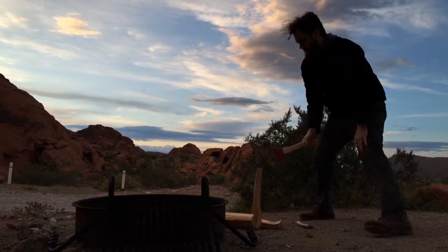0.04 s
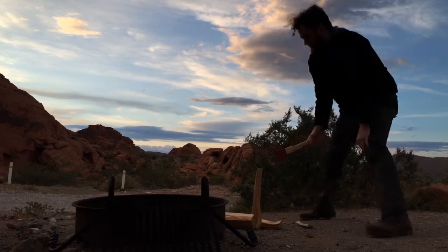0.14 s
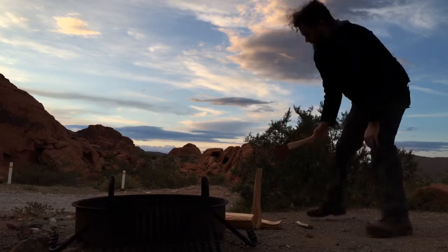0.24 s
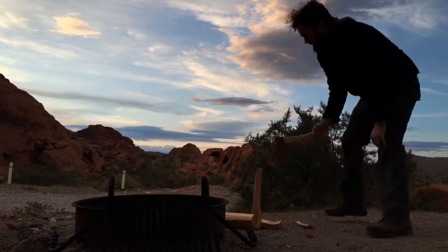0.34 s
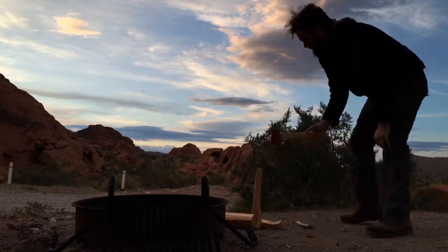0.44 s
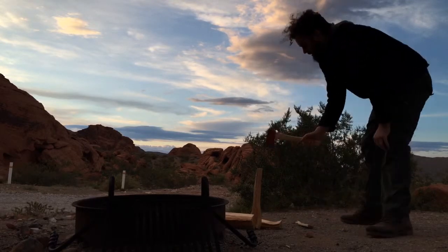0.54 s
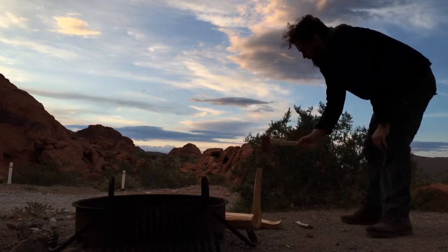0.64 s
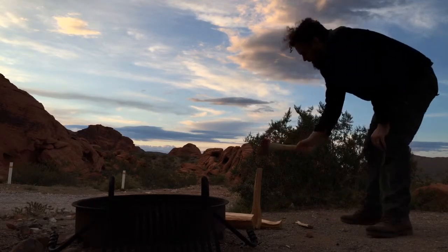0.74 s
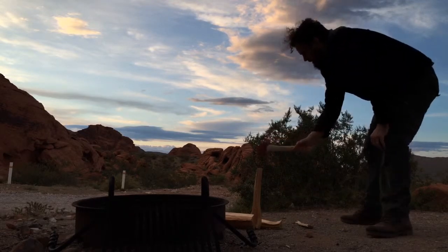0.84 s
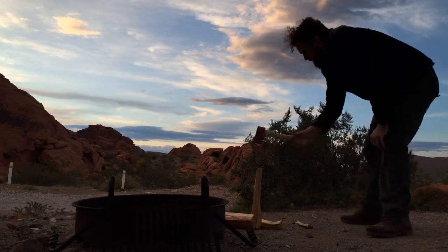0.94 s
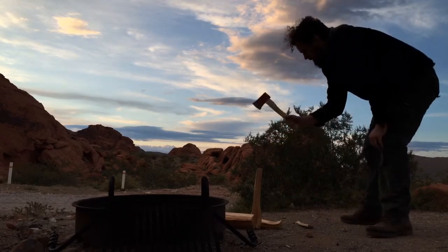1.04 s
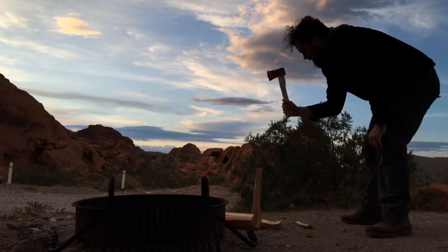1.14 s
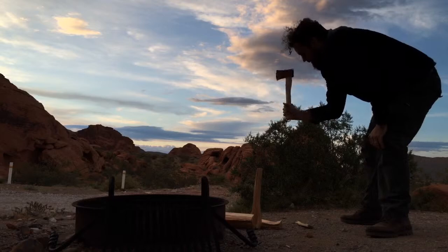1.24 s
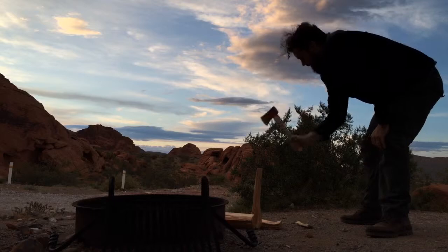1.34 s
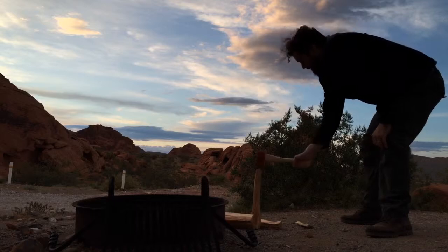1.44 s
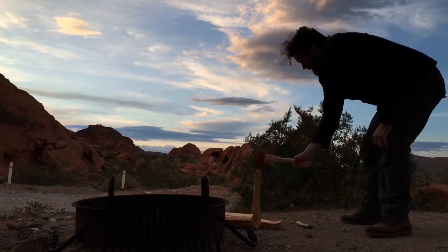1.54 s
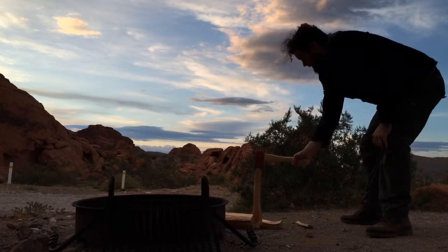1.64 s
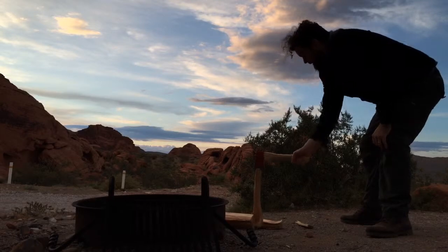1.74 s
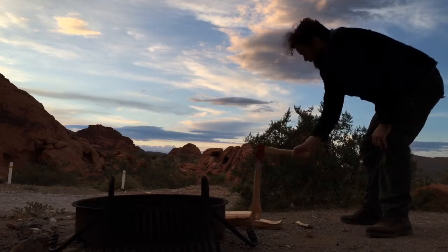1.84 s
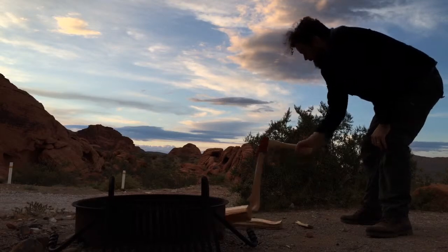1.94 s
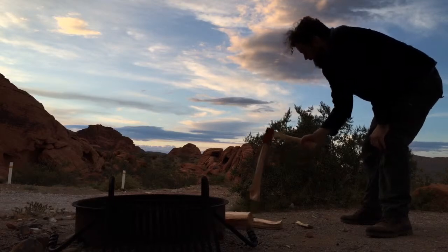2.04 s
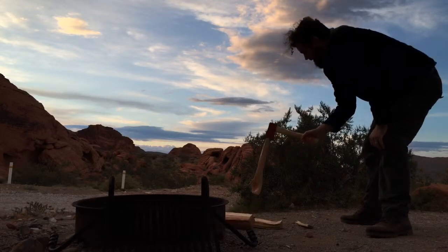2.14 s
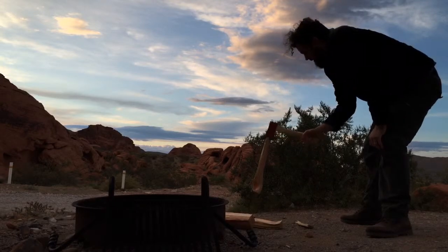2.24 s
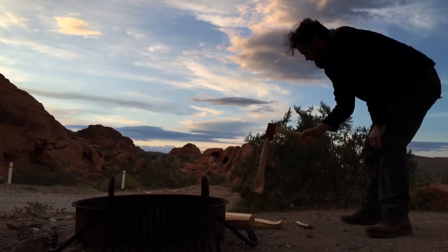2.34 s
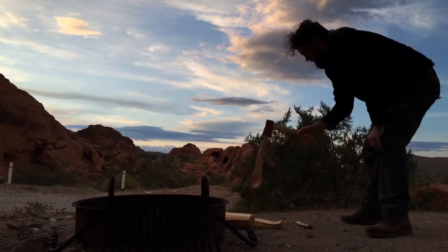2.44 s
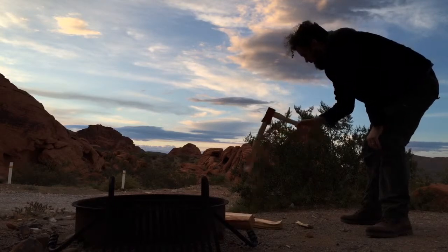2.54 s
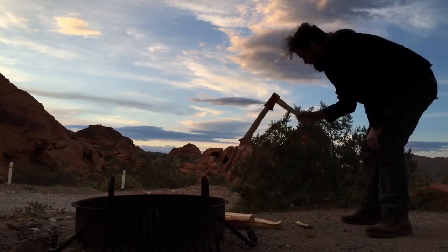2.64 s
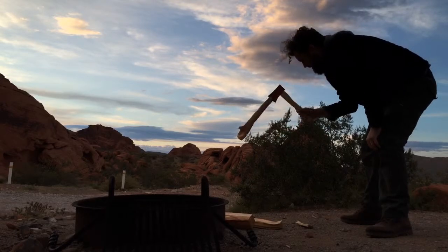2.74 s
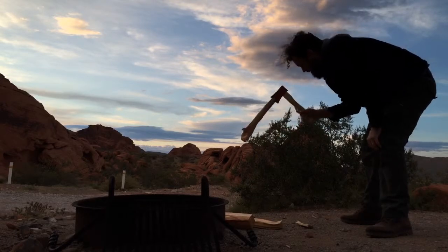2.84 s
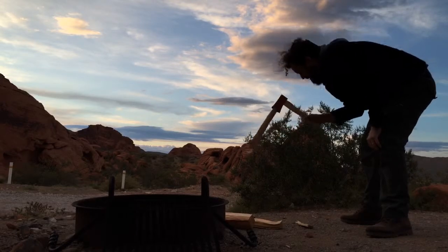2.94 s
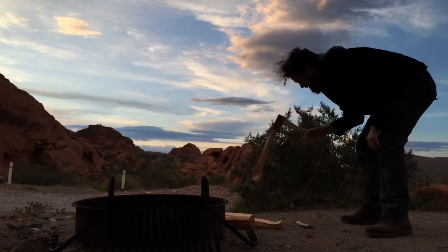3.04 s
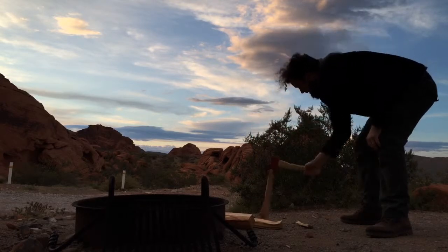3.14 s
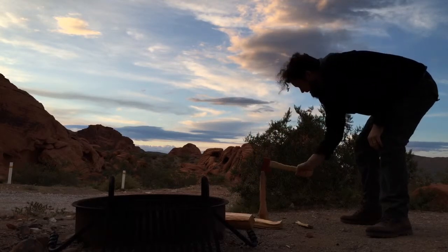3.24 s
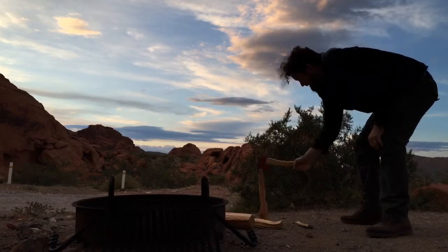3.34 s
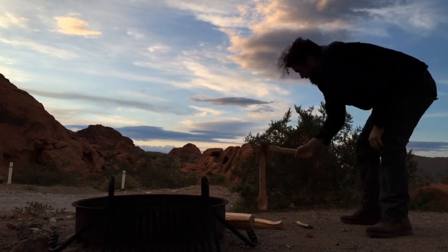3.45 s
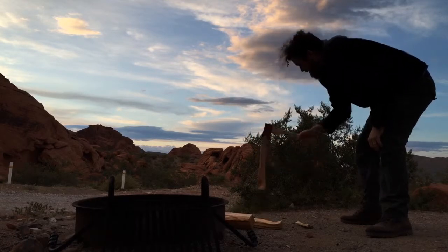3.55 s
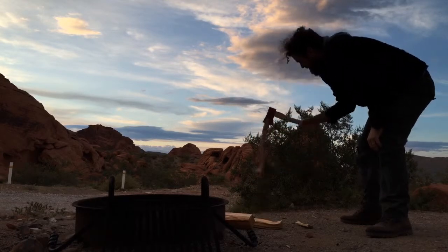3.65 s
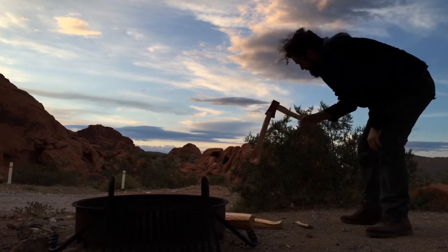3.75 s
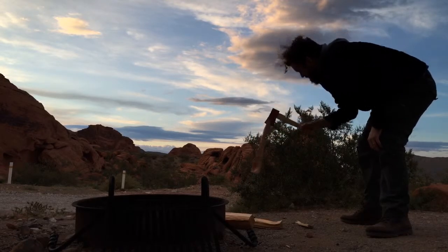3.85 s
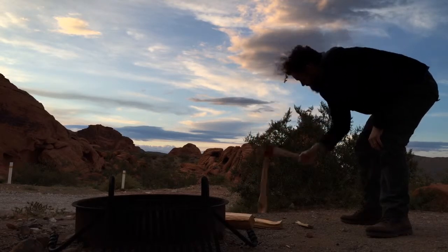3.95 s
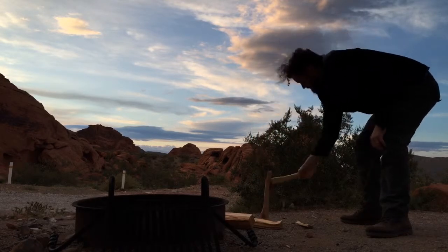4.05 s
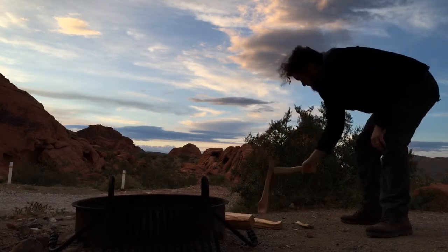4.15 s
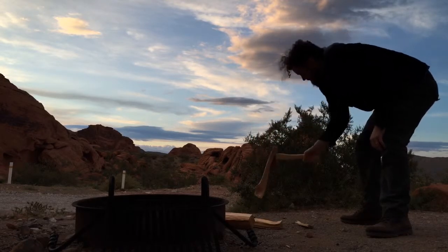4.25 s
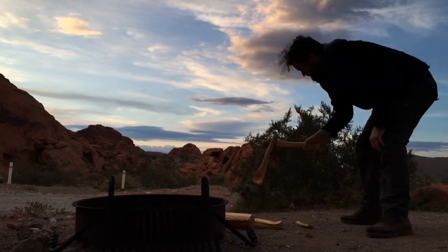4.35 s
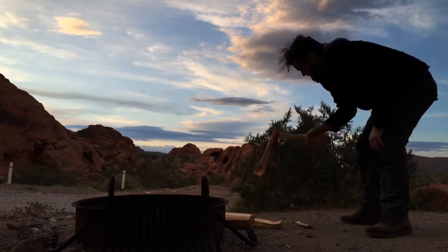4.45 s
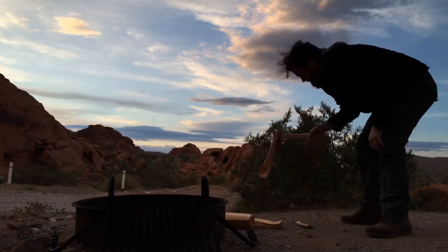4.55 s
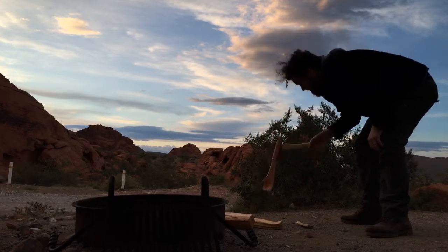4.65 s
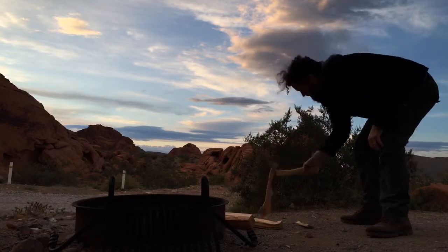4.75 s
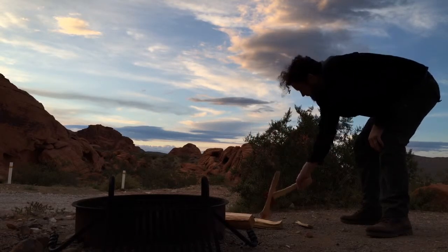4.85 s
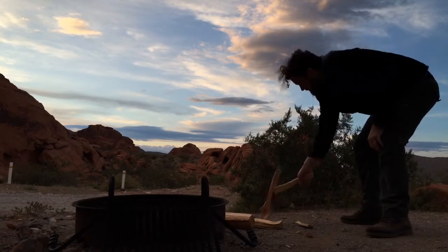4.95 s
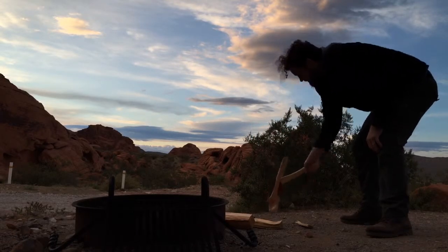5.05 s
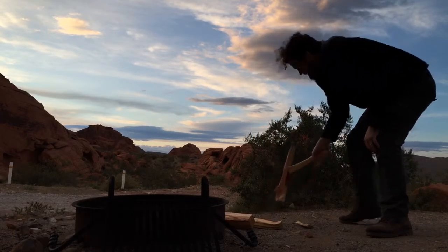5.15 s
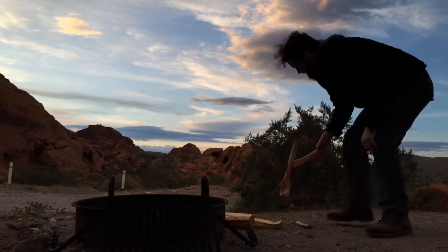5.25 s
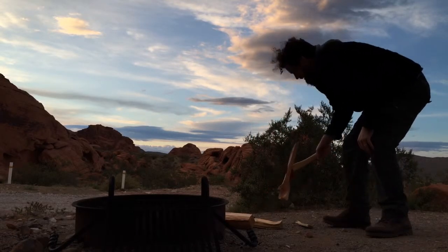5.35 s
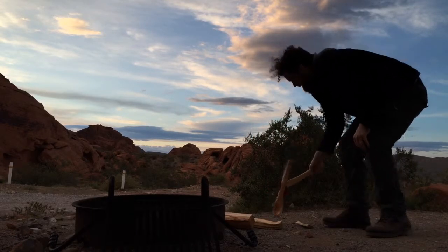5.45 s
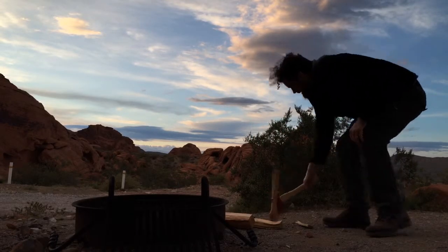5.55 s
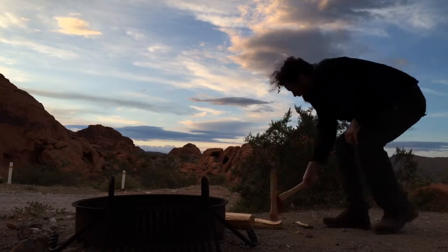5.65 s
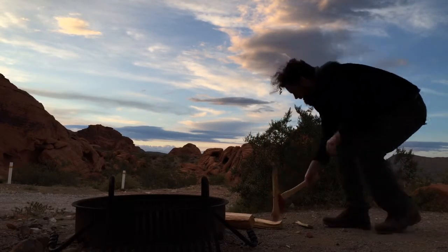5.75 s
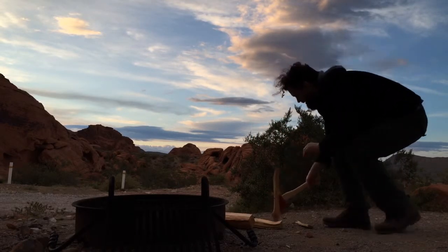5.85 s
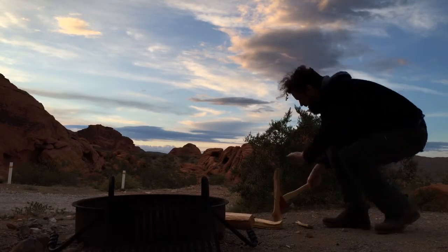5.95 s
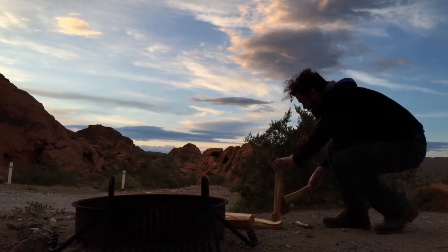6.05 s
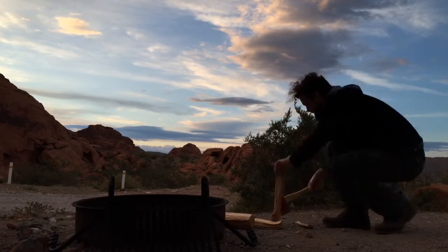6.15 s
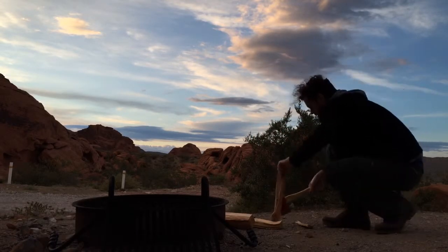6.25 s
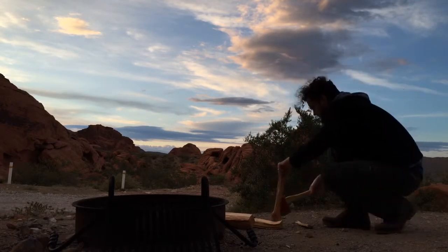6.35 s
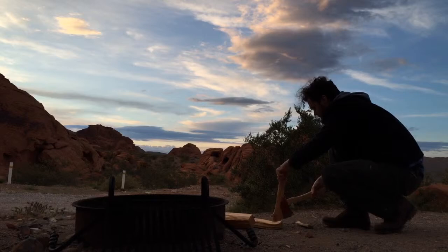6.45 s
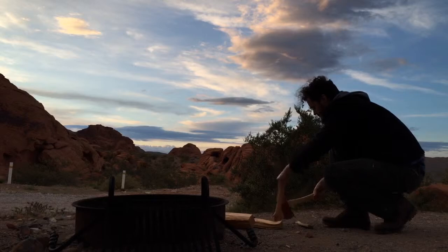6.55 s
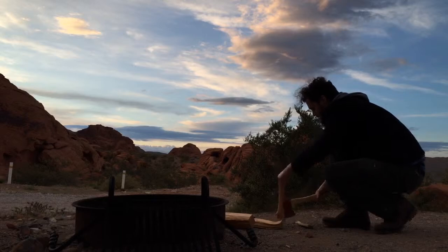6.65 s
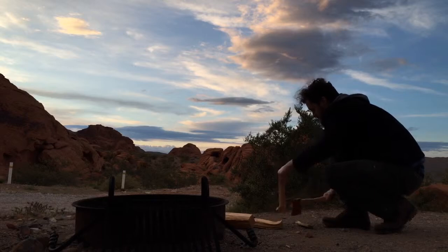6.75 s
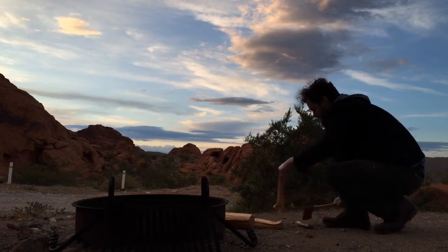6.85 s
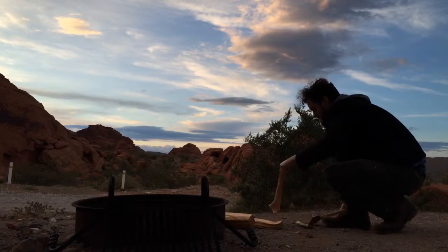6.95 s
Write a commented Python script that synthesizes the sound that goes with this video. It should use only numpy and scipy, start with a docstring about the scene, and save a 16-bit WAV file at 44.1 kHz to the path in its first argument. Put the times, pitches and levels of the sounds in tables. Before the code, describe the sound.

Spaced woody chops and a splintering crack at an open campsite, with boots scuffing gravel, soft thuds and low wind on the microphone.

```python
"""At a desert campsite with gravelly ground, kindling is split with a hatchet in an upright log.
Blows are coloured noise bursts with log and steel modes; the splinters' ticks are short bursts.
Boots scuff as modulated noise and thud as low swings; loose wood rings in pairs of modes.
The lifted wood squeaks on the blade as a gliding tone; ground, brush and rocks return noise tails.
Light wind on the microphone is lumpy low noise with a few low puffs, over a quiet steady hiss."""
import sys
import numpy as np
from scipy import signal
from scipy.fft import rfft, irfft, next_fast_len
from scipy.io import wavfile

SR = 44100
rng = np.random.default_rng(int(sys.argv[2]) if len(sys.argv) > 2 else 0)


def output_pcm(signal):
    """Save a mono or channel-first signal as 16-bit PCM at the path in sys.argv[1].

    Samples are clipped to [-1, 1] before scaling.
    """
    pcm = np.clip(np.atleast_2d(signal).T, -1, 1) * 32767
    wavfile.write(sys.argv[1], SR, np.round(pcm).astype(np.int16))


N = 308259
TIME = np.arange(N) / SR
SHORT = np.arange(8192) / SR   # time axis of a brief sound, s

# Wind rumble over time. Each row: time in seconds, mean level in dB.
WIND_LEVEL = [(0.0, -60), (0.28, -59.5), (0.42, -73), (1.03, -75), (1.2, -59), (1.49, -69), (1.79, -62),
              (1.98, -79), (2.23, -84), (2.38, -75.5), (3.2, -75), (3.43, -65), (3.93, -68.5), (4.2, -62.5),
              (4.5, -67), (5.34, -64.5), (6.45, -80.5), (6.85, -74)]
# Spectrum of the rumble. Each row: frequency in Hz, relative level per Hz in dB.
RUMBLE_SPECTRUM = [(15, -42), (25, -20), (45, -5), (70, 0.5), (100, -5), (140, -13), (200, -16.5),
                   (300, -31), (600, -69.5)]
# Puffs of wind on the microphone. Each row: start in seconds, peak level in dB, mean pitch in Hz.
PUFFS = [(0.059, -49, 93.4), (0.112, -38.5, 78), (0.172, -43, 68), (0.339, -32.5, 75), (0.794, -43, 77),
         (0.998, -44.5, 57), (1.073, -41.5, 61.5), (1.122, -40.5, 57.6), (1.382, -45.5, 60),
         (1.865, -43, 54.4)]
# Spectrum of the steady hiss. Each row: frequency in Hz, relative level per Hz in dB.
AIR_SPECTRUM = [(40, -11.5), (126, -11), (200, -13.5), (320, -22.5), (700, -27), (1300, -26), (2400, -26.5),
                (5000, -32), (15500, -38)]

# Strokes of boots, clothes and wood over the ground. Each row: start in seconds, attack in seconds,
# hold in seconds, release t60 in seconds, rubbing in dB, grit in dB (both before the layer's own gain).
SCUFFS = [(0.02, .035, .01, 0.44, -66.5, -74), (0.115, .025, 0.069, 0.44, -49.5, -56),
          (0.176, .005, 0.019, 0.11, -45.5, -73), (0.582, 0.0085, 0.0094, 0.11, -46.5, -56),
          (0.602, 0.0093, .13, 0.16, -52, -63), (1.266, 0.07, 0.058, 0.2, -66, -64),
          (2.061, 0.034, 0.017, 0.24, -63.5, -71), (2.196, 0.009, 0.01, 0.14, -61.5, -51),
          (2.245, 0.041, 0.013, 0.39, -58.5, -68.5), (3.18, 0.016, 0.025, 0.19, -53.5, -54),
          (3.376, 0.024, .005, .35, -58, -57), (3.557, .035, 0.037, 0.18, -62.5, -63.5),
          (3.943, 0.015, 0.017, .2, -51.5, -60.5), (3.983, 0.022, 0.018, 0.33, -51, -67),
          (4.02, 0.056, 0.061, 0.11, -50.5, -55.5), (4.644, 0.081, 0.019, 0.25, -64.5, -69),
          (5.009, 0.063, 0.033, 1, -55.5, -58.5), (5.439, 0.028, 0.011, 0.49, -54.5, -65),
          (5.657, .02, 0.043, 0.18, -56.5, -50), (5.751, .01, 0.055, .3, -61.5, -54.5),
          (5.792, 0.022, .015, 0.43, -51, -60), (5.901, 0.027, .006, 0.18, -59, -51),
          (5.938, 0.23, .03, .7, -64, -63), (6.185, 0.0094, 0.088, 0.47, -58.5, -70.5),
          (6.415, 0.13, .02, 0.12, -64, -58), (6.546, 0.064, .04, 0.16, -59, -50.5),
          (6.798, 0.013, 0.0057, .11, -50.5, -49), (6.835, .01, 0.1, .2, -63, -70),
          (6.921, 0.047, .02, .2, -45, -57)]
# Spectra of rubbing and of grit. Each row: frequency in Hz, relative level per Hz in dB.
RUB_SPECTRUM = [(100, -18), (200, -3), (350, -4), (480, -9), (700, -6.5), (1300, -6), (2000, -6.5),
                (2700, -11), (7000, -27.5), (12000, -50)]
GRIT_SPECTRUM = [(1500, -21), (3500, 0.5), (5500, 2), (8000, -3.5), (11000, -7.5), (15000, -8.5)]
# A sole grinding on loose gravel, one row: start in seconds, attack in seconds, hold in seconds,
# release t60 in seconds, level in dB.
GRIND = (0.626, .05, .075, .1, -47.5)

# Sharp ticks of splinters and pebbles. Each row: start in seconds, relative level in dB,
# bass in dB, treble in dB (both against the middle range).
TICKS = [(0.129, -41, 9, -14), (0.183, -36, -1, -24), (0.589, -36.5, 15, -16), (0.687, -33, -10, -34),
         (1.806, -43.5, -3, -15.5), (1.896, -32.5, 1, 5.5), (1.956, -35, 11, -7), (2.208, -41, -12, -7),
         (3.195, -37.5, -12.5, -25.5), (3.95, -34, -39, -44), (4.008, -35, -14, -37.5),
         (4.187, -26.5, -4, -9), (4.248, -29.5, -32, 5.5), (4.262, -38, -7, -8), (4.297, -34, -19, -39),
         (5.32, -43, -18, -25), (5.359, -44, -22.5, -37.5), (5.443, -32, -27.5, -35),
         (5.467, -35, 5.5, -34), (5.495, -37.5, 5, -15), (5.713, -34.5, 18, 8), (5.763, -37.5, 14, 10),
         (5.977, -43, -17, -25), (6.188, -37, -4, -41), (6.612, -40, -10.5, -16.5),
         (6.639, -32.5, -22, -15), (6.836, -25.5, 5, -28), (6.939, -32.5, 7.5, -28), (6.978, -31, -9, -34)]
# Dull thuds of boots and wood on the ground. Each row: start in seconds, relative level in dB,
# mean pitch in Hz, scrape of the landing in dB before the rubbing gain.
THUDS = [(0.516, -48.5, 213, -58.5), (1.024, -49.5, 177, -60), (1.288, -40.5, 163.7, -59),
         (1.965, -35.5, 182, -49), (2.283, -35, 168, -58), (2.314, -44, 196, -63),
         (2.361, -40.5, 188, -60.5), (2.792, -53.5, 197, -63.5), (3.202, -39, 197.8, -56),
         (3.906, -47, 182, -73.5), (4.811, -42.5, 175, -68), (5.465, -47, 157, -53.5),
         (5.64, -38.5, 213, -57), (5.66, -39, 175, -56), (5.816, -44, 227, -56), (6.191, -34.5, 183, -57),
         (6.872, -33.5, 190, -60), (6.981, -30, 183, -50)]

# Tone colours of the seven blows, in order. Each row: frequency in Hz, relative level per Hz in dB.
BITE = [(80, -21), (180, -7.5), (230, -12.5), (410, -0.2), (650, 1), (920, -8), (1160, -3), (1300, -0.5),
        (2070, -17.5), (2330, -8.5), (2940, -14.5), (3710, -8), (8380, -17), (15000, -20.5)]
SLAM = [(80, -12.5), (180, -2.5), (250, -6.5), (360, -0.5), (580, 0), (730, -10), (920, -4), (1300, -8.5),
        (1640, -2.5), (2070, -4.5), (2620, -10), (5910, -10), (11880, -13.5), (15000, -15.5)]
SPLIT = [(80, -18), (140, -11.5), (200, -7.5), (290, -17), (460, -1), (1160, -2.5), (1640, -11.5),
         (1840, -15.5), (2940, -10), (4170, -5.5), (5260, -11), (6640, -8.5), (8380, -14.5), (15000, -19)]
TEAR = [(88, -43), (150, -7.5), (332, -13), (618, -2), (1240, -13), (1540, -16.5), (4140, -10), (5990, -17),
        (7130, -11), (10500, -23), (11800, -13), (15500, -17)]
RIP = [(88, -22), (150, -9), (352, -8), (583, -8.5), (1540, -16), (2600, -4.5), (3830, -14), (4650, -7.5),
       (10500, -16.5), (14300, -19), (15500, -21)]
PRISE = [(180, -34), (300, 3), (571, -6), (1620, -6.5), (1810, -12.5), (3750, -6), (6680, -9), (7250, -5),
         (15500, -13)]
SNAP = [(120, -67), (200, -34), (974, -13.5), (1150, -24.5), (1910, -7), (2130, -9), (2800, -8.5),
        (3480, -3), (4180, -11.5), (6020, -8), (7900, -16.5), (9480, -13), (11400, -19), (13400, -9.5),
        (15500, -36)]
# Blows on the log. Each row: start in seconds, rms level over 20 ms in dB (steel apart),
# crack rise in seconds, start of the second crack in seconds, second crack in dB against the first,
# splintering in dB against the first before its random spread, tone colour.
BLOWS = [(1.5462, -20, 0.0032, 1.5541, -1.5, -16.5, BITE), (3.2899, -20.5, 0.0025, 3.2956, -2, -19, SLAM),
         (4.1232, -17.5, 0.0025, 4.1303, 0, -10, SPLIT), (4.9198, -29, 0.0017, 4.9341, -1, -8, TEAR),
         (4.9501, -29.5, 0.00176, 4.9579, -4, -8.5, RIP), (5.6379, -36, 0.0023, 5.6465, -21, -3, PRISE),
         (6.5285, -26, 0.0013, 6.5345, 8, -14, SNAP)]
# Modes of the log. Each row: frequency in Hz, mean relative level in dB before colouring, t60 in seconds.
LOG_MODES = [(198, -12, 0.06), (443, -1.5, 0.013), (598, 2, .024), (691, -6.5, 0.0071), (935, -10.5, 0.01),
             (1230, 0, 0.013), (1590, -4, 0.012), (1930, -5, 0.015), (2480, -11, 0.017), (2820, -12, 0.024),
             (3940, -15.5, 0.046), (4000, -6, 0.012), (5790, -6, 0.032)]
# Faint after-ring of the steel. Each row: frequency in Hz, mean relative level in dB, t60 in seconds.
STEEL_MODES = [(657, -51.5, 1), (920, -55, .4), (1570, -51, .5), (3460, -59.5, .45), (6000, -52, .4)]

# Chips and loose sticks, landing or jostled. Each row: start in seconds, relative level in dB,
# mean pitch in Hz, upper mean pitch in Hz, upper mode in dB against the lower, t60 in seconds.
CLINKS = [(1.586, -54.5, 1370, 1720, 13, 0.11), (1.803, -53, 643, 1173, -5.5, .15),
          (1.897, -52, 1150, 2590, -8, 0.12), (1.962, -41.5, 638, 1594, -6.5, .13),
          (2.204, -55.5, 920, 1444, 0, 0.38), (2.275, -48.5, 1160, 1775, -2.5, 0.088),
          (2.288, -44, 340, 550, -12.5, 0.18), (2.313, -50, 870, 1270, -1.5, 0.064),
          (3.454, -52.5, 608, 3464, -4, .21), (3.586, -49, 1400, 2564, -5, 0.087),
          (4.248, -52, 2940, 5970, 4, 0.14), (4.326, -55, 2990, 6020, -0.5, 0.14),
          (5.149, -47, 1890, 2460, 6, 0.047), (5.443, -44.5, 1670, 2360, 9, 0.027),
          (5.492, -53, 576, 1234, 12.5, 0.1), (5.544, -48.5, 905, 1206, 4, 0.12),
          (6.611, -48.5, 2030, 2984, 4.5, 0.22), (6.64, -49, 900, 1510, -13, 0.14),
          (6.837, -42, 466, 810, -3, 0.093)]
# Squeak of wood on the wedged blade as it is lifted, one row: start in seconds, attack in seconds,
# hold in seconds, release t60 in seconds, mean level in dB, first mean pitch in Hz, last mean pitch in Hz.
SQUEAK = (3.369, .02, .02, .09, -52, 820, 1190)

# Decay of sound scattered by ground and brush. Each row: frequency in Hz, t60 in seconds.
SCATTER_T60 = [(150, 0.45), (500, 0.083), (1400, 0.17), (4000, 0.14), (12000, 0.07)]
# Echoes from rocks. Each row: delay of the onset in seconds, energy in dB before the far low-pass.
ROCKS = [(.108, -47.5), (.132, -48.5), (.178, -46.5)]


def from_db(db):
    """Logarithmic level: twenty decibels are a factor of ten in amplitude."""
    return 10 ** (np.asarray(db) / 20)


def unit_energy(x):
    """Energy normalisation: the sum of squares becomes 1."""
    return x / np.sqrt(np.sum(x ** 2) + 1e-20)


def at_hz(points, hz):
    """Logarithmic frequency scale: a table is interpolated along it."""
    f, value = np.transpose(points)
    return np.interp(np.log(np.maximum(hz, 1)), np.log(f), value)


def add(out, s, sound):
    """Superposition: a sound is summed into the output from time s."""
    i = max(round(s * SR), 0)
    out[i:i + len(sound)] += sound[:max(len(out) - i, 0)]


def flutter(per_s):
    """Random modulation: straight lines join Gaussian values drawn per_s times a second."""
    return np.interp(TIME * per_s, np.arange(4096), rng.standard_normal(4096))


def noise(spectrum, grain_db=0):
    """Spectral shaping of noise to rms 1; uneven grain sizes make it crunch."""
    grain_sizes = from_db(grain_db * np.minimum(rng.exponential(1, N), 6))
    grains = rng.standard_normal(N) * grain_sizes
    size = next_fast_len(N)
    gains = from_db(at_hz(spectrum, np.fft.rfftfreq(size, 1 / SR)))
    shaped = irfft(rfft(grains, size) * gains, size)
    return unit_energy(shaped[:N]) * np.sqrt(N)


def coloured(x, spectrum):
    """Minimum-phase filtering: a short sound takes the broad outline of a spectrum, with energy 1."""
    bins = rfft(x)
    k = np.arange(len(bins))
    # outline: rms over half an octave around each bin
    low = (k / 2 ** .25).astype(int)
    high = np.minimum((k * 2 ** .25).astype(int) + 2, k[-1])
    running = np.cumsum(abs(bins) ** 2)
    outline = np.sqrt((running[high] - running[low]) / (high - low) + 1e-12)
    wanted = from_db(at_hz(spectrum, k * SR / len(x)))
    # keeping only the causal half of the cepstrum makes the filter causal
    cepstrum = irfft(np.log(wanted / outline))
    causal_filter = np.exp(rfft(2 * cepstrum[:len(x) // 2], len(x)))
    return unit_energy(irfft(bins * causal_filter))


def swell(t, rise):
    """Impulsive envelope: it peaks at 1 after the rise time, then dies."""
    age = np.maximum(t, 0) / rise
    return age * np.exp(1 - age)


def stroke(s, attack, hold, t60):
    """Envelope of one movement: linear growth, a hold at 1 and exponential decay."""
    age = TIME - s
    decay = from_db(-60 * np.clip((age - attack - hold) / t60, 0, 2))
    return np.clip(age / attack, 0, 1) * decay


def ringing(modes, t, spread_db):
    """Modal superposition: decaying sines start together, with new strengths at each blow."""
    out = np.zeros(len(t))
    for hz, db, t60 in modes:
        strength_db = db + spread_db * rng.normal()
        out += from_db(strength_db - 60 * t / t60) * np.sin(2 * np.pi * hz * t)
    return out


def thumps(rows, rise, uneven):
    """Damped low oscillation: each soft push gives a few cycles of unsteady pitch."""
    out = np.zeros(N)
    for s, db, hz in rows:
        unsteady_hz = hz * (1 + uneven * flutter(hz)[:len(SHORT)])
        turns = np.cumsum(unsteady_hz) / SR
        add(out, s, from_db(db) * swell(SHORT, rise) * np.sin(2 * np.pi * turns))
    return out


def wind(gust_db=7.0, gusts_per_s=8.1):
    """Pressure fluctuation at the microphone: low noise of lumpy level, with a few damped puffs."""
    level_db = np.interp(TIME, *np.transpose(WIND_LEVEL)) + gust_db * np.tanh(flutter(gusts_per_s))
    rumble = from_db(level_db) * noise(RUMBLE_SPECTRUM)
    return rumble + thumps(PUFFS, rise=0.011, uneven=0.43)


def hiss(level_db=-68.3):
    """Stationary noise: a fixed spectrum at a constant mean level."""
    return from_db(level_db) * noise(AIR_SPECTRUM)


def patchy(x, patch_db=2.7, per_s=45):
    """Shifting contacts: overlapping bands a third of an octave apart swell separately; rms 1."""
    size = next_fast_len(N)
    bins, out = rfft(x, size), np.zeros(N)
    hz = np.fft.rfftfreq(size, 1 / SR)
    place = np.clip(3 * np.log2(hz / 250 + 1e-9), 0, 13)
    for band in range(14):
        share = np.maximum(1 - abs(place - band), 0)
        out += irfft(bins * share, size)[:N] * from_db(patch_db * flutter(per_s))
    return unit_energy(out) * np.sqrt(N)


def strays(per_s=26, centre_hz=2000, octaves=.7, t60=.012, spread_db=1.5):
    """Resonant filtering of impacts: single flicked stones click at pitches of their own, peaks near 1."""
    out, t = np.zeros(N), TIME[:1024]
    starts = np.cumsum(rng.exponential(size=400)) / per_s
    draws = np.clip(rng.standard_normal(size=(400, 2)), -2, 2)
    for s, (pitch, size) in zip(starts, draws):
        hz = centre_hz * 2 ** (octaves * pitch)
        crack = rng.standard_normal(len(t)) * from_db(-60 * t / t60)
        click = signal.lfilter(*signal.iirpeak(hz, 2, fs=SR), crack)
        add(out, s, from_db(spread_db * size) * click / abs(click).max())
    return out


def pebbles(count=6500, centre_hz=1850, octaves=.38, t60=.016, spread_db=4):
    """Dense superposition of impacts: small stones ring briefly at random pitches; rms 1."""
    out, t = np.zeros(N), TIME[:1024]
    draws = np.clip(rng.standard_normal(size=(count, 2)), -2, 2)
    for when, (pitch, size) in zip(rng.random(size=count), draws):
        hz = centre_hz * 2 ** (octaves * pitch)
        envelope = from_db(spread_db * size - 60 * t / t60)
        add(out, when * N / SR, envelope * np.sin(2 * np.pi * hz * t))
    return unit_energy(out) * np.sqrt(N)


def scuffs(rub_db=-1.0, grit_db=-2, stick_db=1.46, crunch_db=2.0, pebble_db=-4, stray_db=11):
    """Stick-slip friction: soles and cloth rub in uneven slips, while pebbles roll and grit crunches."""
    # the scrape of a landing dies quickly and stirs little grit
    landing_rise, landing_t60, landing_grit_db = 0.0023, .11, -15.5
    landings = [(s, landing_rise, landing_rise, landing_t60, db, db + landing_grit_db)
                for s, _, _, db in THUDS]
    rub_power, grit_power = np.zeros(N), np.zeros(N)
    # overlapping strokes add as powers
    for s, attack, hold, t60, rubbing_db, gritty_db in SCUFFS + landings:
        power = stroke(s, attack, hold, t60) ** 2
        rub_power += power * from_db(rubbing_db) ** 2
        grit_power += power * from_db(gritty_db) ** 2
    # quick slips, plus slower changes of pressure
    slips = flutter(170) + 0.53 * flutter(45)
    rub = np.sqrt(rub_power) * from_db(rub_db + stick_db * slips)
    grit = np.sqrt(grit_power) * from_db(grit_db + crunch_db * slips)
    *grind_shape, grind_db = GRIND
    rolling = rub * from_db(pebble_db) + from_db(grind_db) * stroke(*grind_shape)
    # stray stones are heard only under a stroke, at a level set against its rubbing
    rubbing = patchy(noise(RUB_SPECTRUM, grain_db=3.5)) + from_db(stray_db) * strays()
    return rub * rubbing + rolling * pebbles() + grit * noise(GRIT_SPECTRUM, grain_db=3.5)


def ticks(level_db=12.5, rise=0.001, ring_db=-22, ring_t60=0.046):
    """Impact of small hard bodies: a tiny noise crack and a short woody rattle."""
    out = np.zeros(N)
    for s, db, bass_db, treble_db in TICKS:
        envelope = swell(SHORT, rise) + from_db(ring_db - 60 * SHORT / ring_t60)
        contact = rng.standard_normal(len(SHORT)) * envelope
        colour = [(100, bass_db - 8), (550, bass_db), (1700, 0.01), (7000, treble_db), (15000, treble_db - 1.0)]
        add(out, s, from_db(db + level_db) * coloured(contact, colour))
    return out


def thuds(thud_db=-.5, overtone=1.6, overtone_db=-14):
    """Damped ground response: weight on packed earth gives a low swing and a weaker overtone."""
    lower = [(s, db, hz) for s, db, hz, _ in THUDS]
    upper = [(s, db + overtone_db, hz * overtone) for s, db, hz in lower]
    swings = thumps(lower, rise=0.0081, uneven=.12) + thumps(upper, rise=0.0082, uneven=0.14)
    return from_db(thud_db) * swings


def chops(knock_db=-7, splinter_t60=0.14, fibre_spread_db=3.5, second_rise=.0014, steel_db=-7):
    """Fracture and modal excitation: two cracks of the fibres, the log's modes and splintering."""
    out = np.zeros(N)
    for s, db, rise, second_s, second_db, splinter_db, colour in BLOWS:
        first, second, fibres = rng.standard_normal((3, len(SHORT)))
        blow = first * swell(SHORT, rise) ** 3
        blow += second * from_db(second_db) * swell(SHORT - (second_s - s), second_rise) ** 3
        # fibres give way singly and in clumps
        single = np.minimum(rng.exponential(1, len(SHORT)), 4) - 1
        clumps = np.tanh(flutter(400)[:len(SHORT)])
        fibre_db = fibre_spread_db * (single + clumps) + splinter_db - 60 * SHORT / splinter_t60
        blow += fibres * np.tanh(SHORT / rise) * from_db(fibre_db)
        # the log is shoved as the first crack peaks
        add(blow, rise, from_db(knock_db) * ringing(LOG_MODES, SHORT, spread_db=1.0))
        # energy 1 spread over 20 ms gives rms 1
        add(out, s, from_db(db) * np.sqrt(SR / 50) * coloured(blow, colour))
        add(out, s, from_db(db + steel_db) * ringing(STEEL_MODES, TIME[:SR], spread_db=3.0))
    return out


def clinks(level_db=-1, blur_hz=60, rattle_db=3.0, rise_share=0.019):
    """Two-mode vibration: each small piece of wood rings, blurred as it rattles on the ground."""
    out, t = np.zeros(N), TIME[:SR // 2]
    for s, db, hz, upper_hz, upper_db, t60 in CLINKS:
        # longer rattles also build up more slowly
        build_up = 1 - np.exp(-t / (rise_share * t60))
        envelope = build_up * from_db(db + level_db - 60 * t / t60)
        for pitch, mode_db in (hz, 0), (upper_hz, upper_db):
            wander, rattle = [np.interp(t * 300, np.arange(200), row)
                              for row in rng.standard_normal((2, 200))]
            # the blur grows as the root of the pitch, from its value at 700 Hz
            blurred_hz = pitch + blur_hz * np.sqrt(pitch / 700) * wander
            turns = np.cumsum(blurred_hz) / SR
            add(out, s, envelope * from_db(mode_db + rattle_db * rattle) * np.sin(2 * np.pi * turns))
    return out


def squeak(glide_s=0.022, rough=.035, rattle_db=2.0, octave_db=-8):
    """Stick-slip oscillation: fibres on the steel give an unsteady tone with a weaker octave."""
    s, attack, hold, t60, db, from_hz, to_hz = SQUEAK
    # the pitch climbs as the pull grows, then holds
    glide_hz = np.interp(TIME, [s, s + glide_s], [from_hz, to_hz])
    hz = glide_hz * (1 + rough * flutter(400))
    phase = 2 * np.pi * np.cumsum(hz) / SR
    tone = np.sin(phase) + from_db(octave_db) * np.sin(2 * phase)
    return from_db(db + rattle_db * flutter(300)) * stroke(s, attack, hold, t60) * tone


def outdoors(x, scatter_db=-15, late_db=-31, late_t60=0.7, echo_rise=0.0034, far_hz=4500):
    """Scattering and reflection: ground and brush add a short tail, rocks return dull, smeared echoes."""
    t, edges = TIME[:SR], np.geomspace(100, 16000, 9)   # band edges in Hz
    near = np.zeros(SR)
    for low, high in zip(edges, edges[1:]):
        band_filter = signal.butter(2, [low, high], "band", fs=SR, output="sos")
        band = signal.sosfilt(band_filter, rng.standard_normal(SR))
        near += band * from_db(-60 * t / at_hz(SCATTER_T60, np.sqrt(low * high)))
    build_up = 1 - np.exp(-(t / 0.0029) ** 2)
    late = rng.standard_normal(SR) * build_up * from_db(-60 * t / late_t60)
    far = from_db(late_db) * unit_energy(late)
    for delay, db in ROCKS:
        echo = rng.standard_normal(SR) * swell(t - delay, echo_rise)
        far += from_db(db) * unit_energy(echo)
    far = signal.sosfilt(signal.butter(1, far_hz, fs=SR, output="sos"), far)
    response = from_db(scatter_db) * unit_energy(near * build_up) + far
    return x + signal.fftconvolve(x, response)[:N]


def scene():
    """Superposition of paths: work on the log in open air, scuffs and ground-borne thuds, wind and hiss."""
    work = outdoors(chops() + ticks() + clinks() + squeak())
    ground = thuds() + scuffs()
    return (work + ground + wind() + hiss())[None]


def record(dry, low_cut_hz=20, cutoff_hz=15500):
    """Band limitation: the microphone drops the deepest bass, and the top is cut steeply."""
    low_cut = signal.butter(2, low_cut_hz, "high", fs=SR, output="sos")
    thinned = signal.sosfilt(low_cut, dry)
    top_cut = signal.ellip(10, .2, 80, cutoff_hz, fs=SR, output="sos")
    return signal.sosfilt(top_cut, thinned)


dry = scene()
out = record(dry)
output_pcm(out)
```